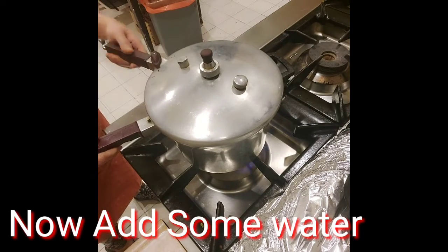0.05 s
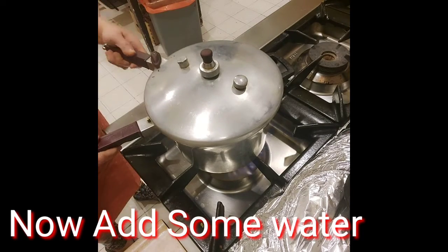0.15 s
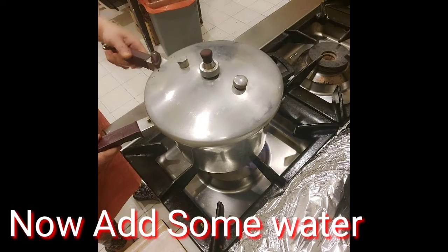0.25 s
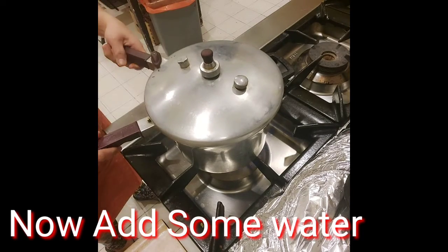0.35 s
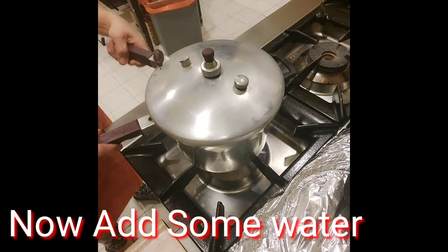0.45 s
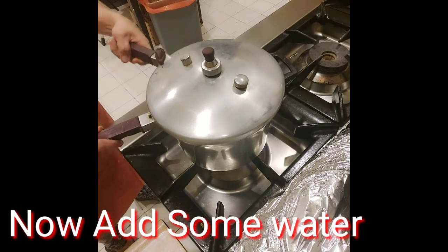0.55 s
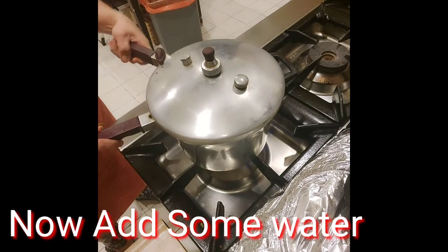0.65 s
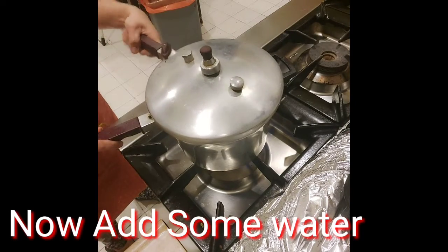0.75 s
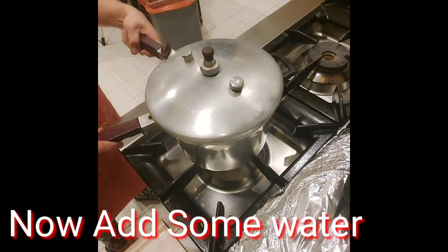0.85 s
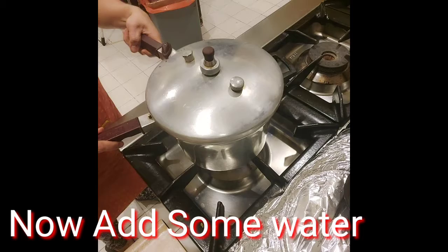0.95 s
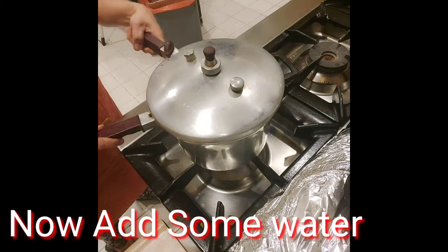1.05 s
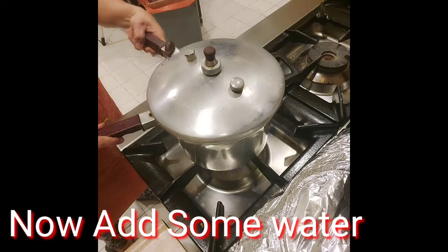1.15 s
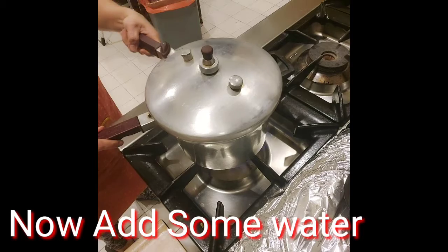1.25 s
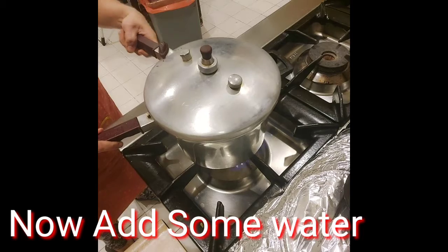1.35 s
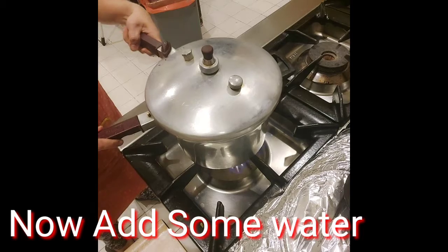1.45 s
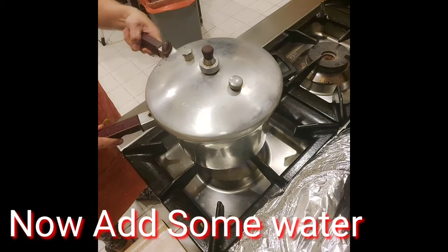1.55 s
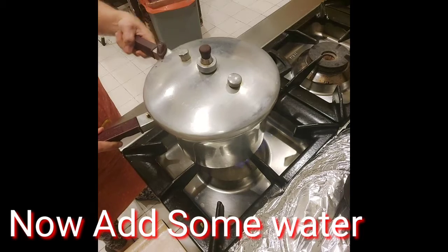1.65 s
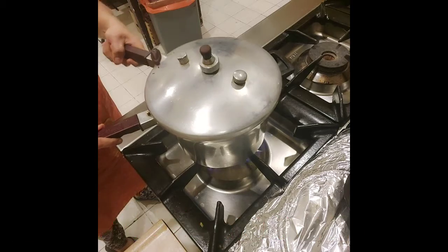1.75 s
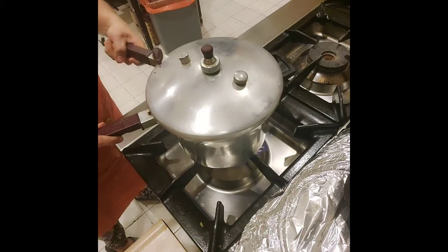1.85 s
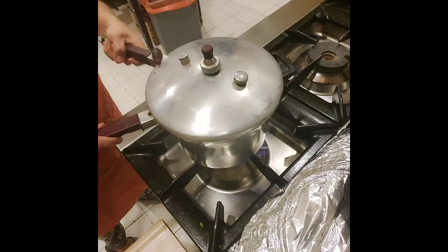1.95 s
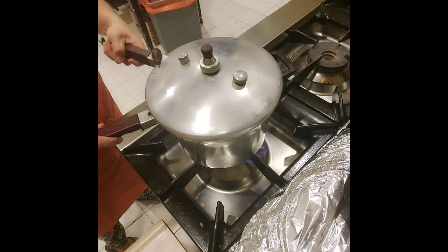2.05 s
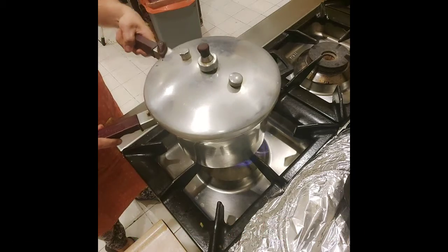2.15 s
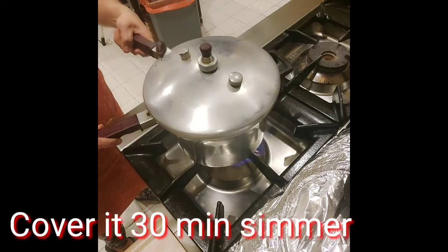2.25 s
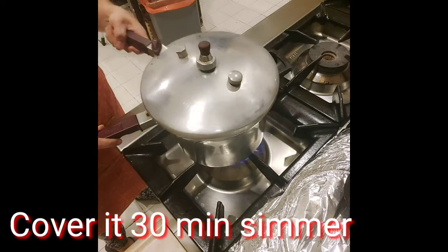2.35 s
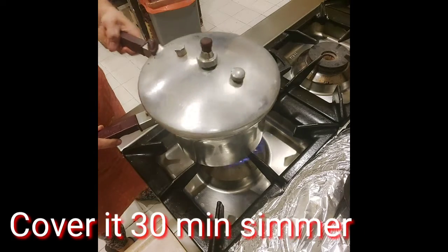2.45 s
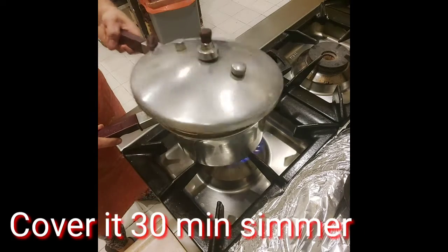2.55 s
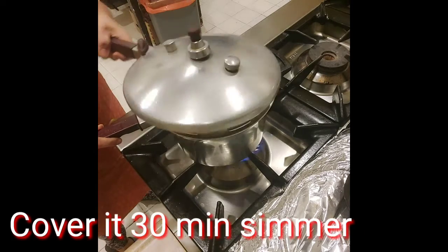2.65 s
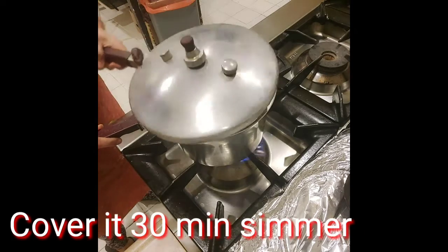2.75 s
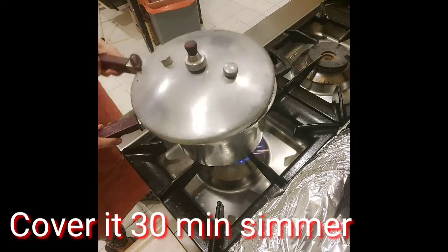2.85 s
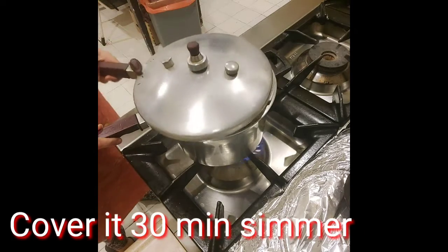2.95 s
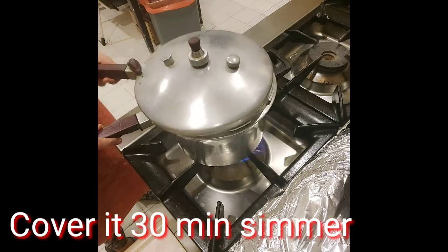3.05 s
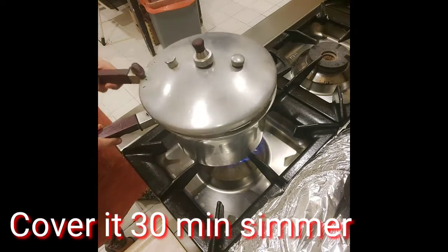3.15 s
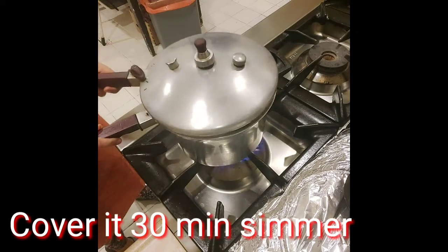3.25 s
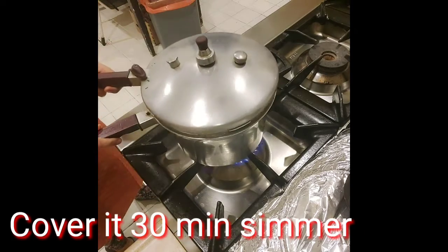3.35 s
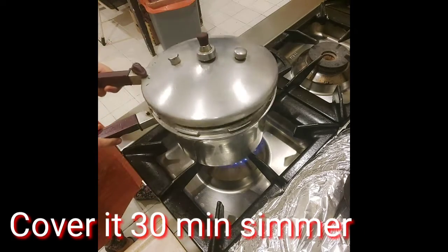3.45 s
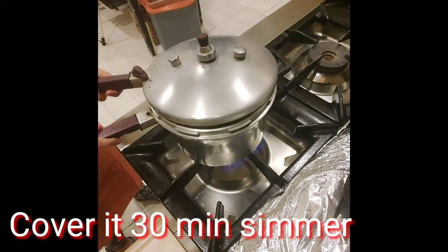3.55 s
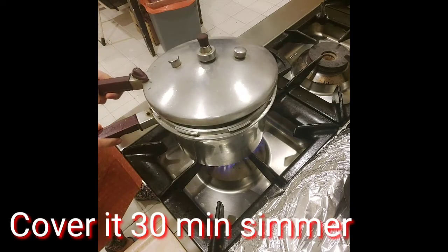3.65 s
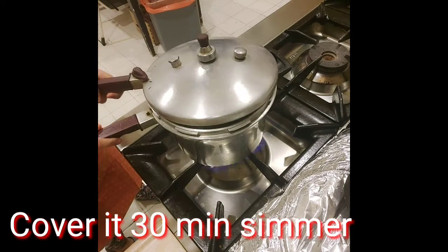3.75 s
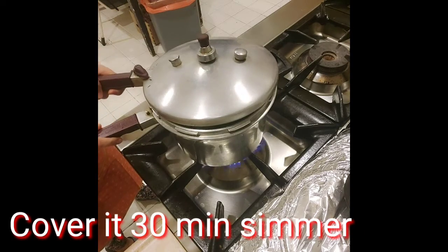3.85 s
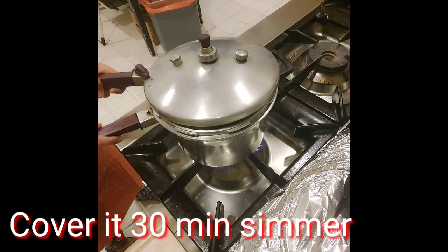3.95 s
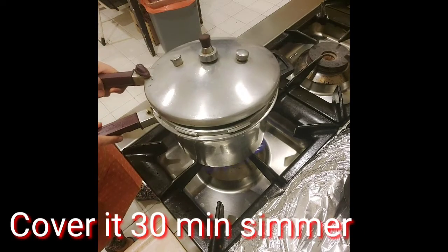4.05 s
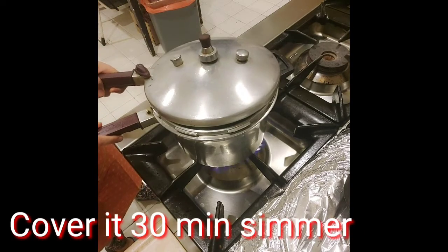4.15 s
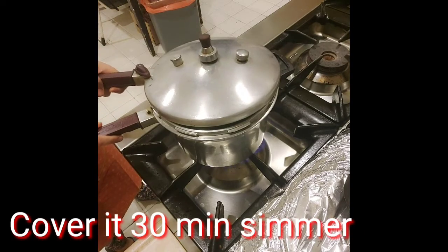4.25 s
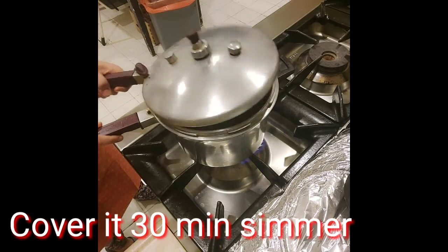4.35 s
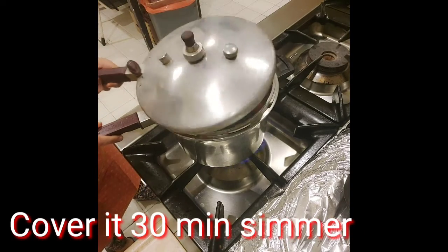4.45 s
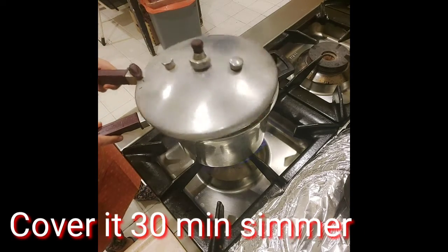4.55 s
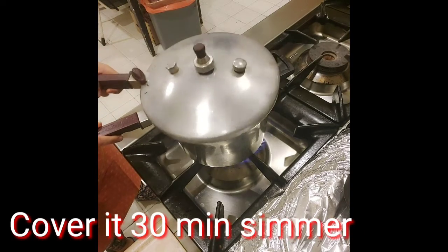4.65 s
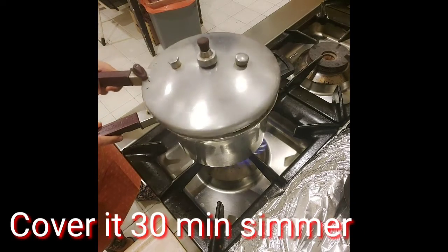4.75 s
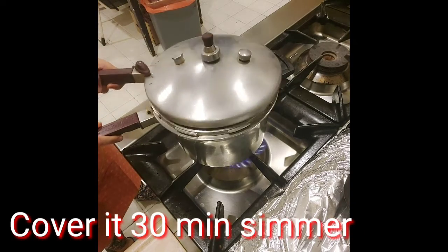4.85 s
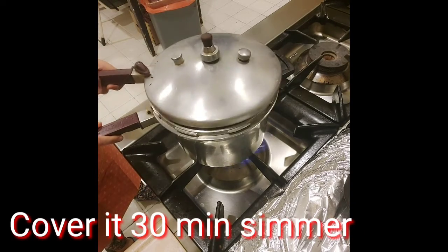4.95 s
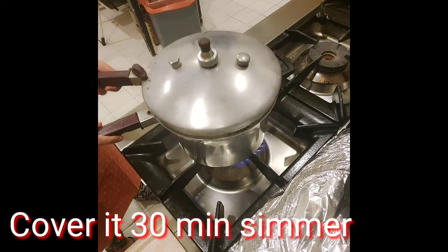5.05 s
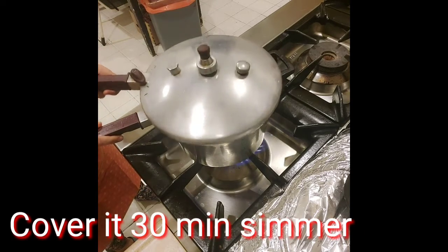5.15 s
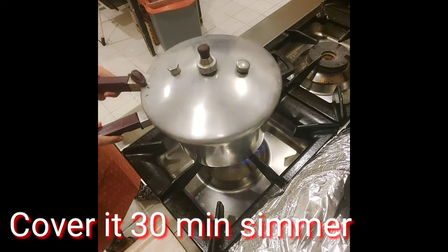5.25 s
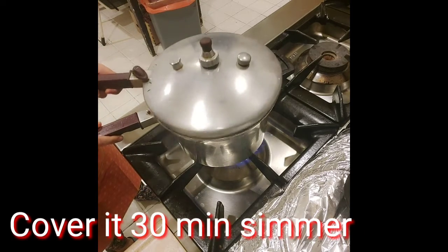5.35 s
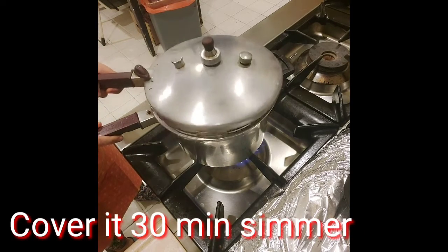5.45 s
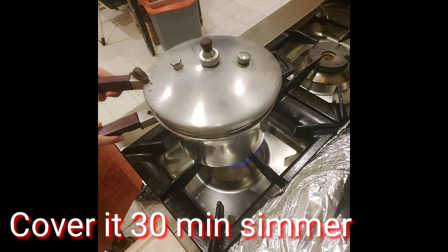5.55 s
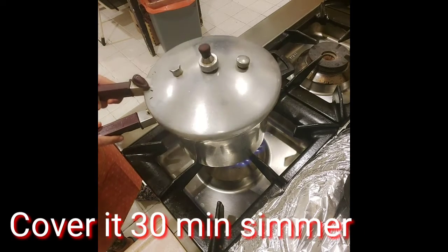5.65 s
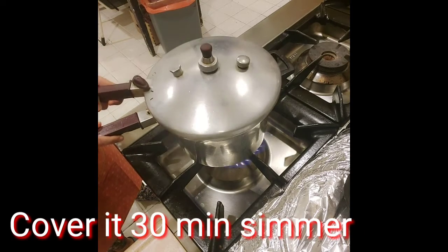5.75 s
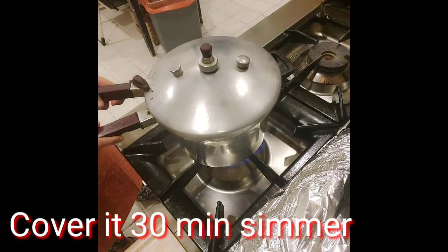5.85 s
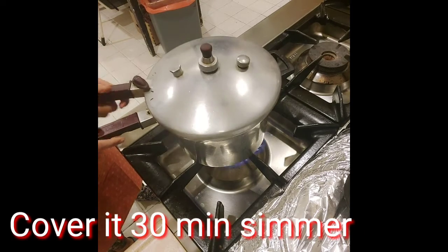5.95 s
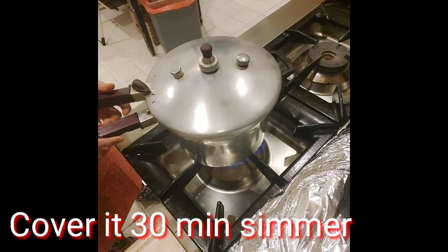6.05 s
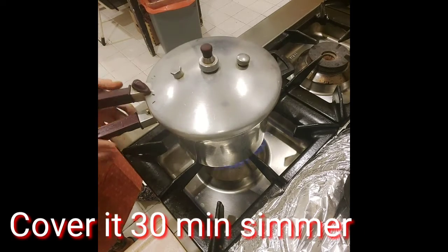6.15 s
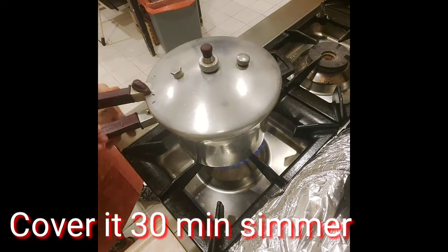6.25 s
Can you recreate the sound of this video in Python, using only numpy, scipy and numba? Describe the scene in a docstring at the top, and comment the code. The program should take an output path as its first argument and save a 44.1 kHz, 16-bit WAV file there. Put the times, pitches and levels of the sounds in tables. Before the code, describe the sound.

A heavy aluminium pot lid is twisted, lifted and rattled back onto its rim, clanking and scraping over a low kitchen burner rumble.

```python
"""A heavy aluminium lid is turned, lifted, rocked and set down on its pot over a gas burner in a kitchen. Each
knock is a noisy crack that rings the lid's modes, the air in the pot, the stove top and a low room boom; the
air note falls as the gap closes. Stick-slip grit scrapes the rim between knocks, narrow noise bands squeak as
the rubber seal drags, and flickering noise bands hum, rumble and hiss behind."""
import sys
import numpy as np
from scipy import signal
from scipy.fft import rfft, irfft
from scipy.io import wavfile
from scipy.ndimage import uniform_filter1d
from numba import njit

SR = 44100
rng = np.random.default_rng(int(sys.argv[2]) if len(sys.argv) > 2 else 0)


def boost_factor(decibels):
    """Convert a level in decibels to a linear amplitude factor."""
    exponent = np.asarray(decibels, float) / 20
    return 10 ** exponent


def output_pcm(signal):
    """Save a mono or channel-first signal as 16-bit PCM at the path in sys.argv[1].

    Samples are clipped to [-1, 1] before scaling.
    """
    pcm = np.clip(np.atleast_2d(signal).T, -1, 1) * 32767
    wavfile.write(sys.argv[1], SR, np.round(pcm).astype(np.int16))


N = 277830


def curve(rows):
    """Rows (time [s], value) joined by straight lines, one value a sample."""
    return np.interp(np.arange(N) / SR, *np.transpose(rows))


def band(x, lo_hz, hi_hz):
    """Band-pass, scaled so that white noise keeps its level."""
    sos = signal.butter(2, [lo_hz, hi_hz], "band", fs=SR, output="sos")
    return signal.sosfilt(sos, x) * np.sqrt(SR / 2 / (hi_hz - lo_hz))


def colour(x, points):
    """Shape a spectrum by (frequency [Hz], gain [dB]) points on a log frequency axis."""
    hz, db = np.transpose(points)
    f = np.maximum(np.fft.rfftfreq(N, 1 / SR), 1)
    return irfft(rfft(x) * boost_factor(np.interp(np.log(f), np.log(hz), db)), N)


def walk(rate_hz):
    """Slow random drift with spread 1."""
    k = int(SR / rate_hz)
    steps = np.repeat(rng.standard_normal(N // k + 1), k)
    w = uniform_filter1d(uniform_filter1d(steps, k), k)[:N]
    return w / w.std()


WIDE_HZ = 1170  # left and right are unrelated from here up


def pair(hz):
    """Left and right noise, alike in the bass and unrelated above."""
    mid, side = rng.standard_normal((2, N))
    wide = min(hz / WIDE_HZ, 1)
    return np.array([mid + wide * side, mid - wide * side]) / np.sqrt(1 + wide ** 2)


@njit
def resonate(drive, hz, t60_s):
    """One decaying mode, a complex resonator whose pitch may move."""
    out, z, loss = np.empty(len(drive), np.complex128), 0j, np.exp(-np.log(1000.) / (t60_s * SR))
    for i in range(len(drive)):
        z = z * loss * np.exp(2j * np.pi * hz[i] / SR) + drive[i] + 1e-18
        out[i] = z
    return out


def mode(drive, hz, t60_s):
    """A mode reaches the two microphones with a phase gap that grows with pitch up to WIDE_HZ."""
    z = resonate(drive, hz * np.ones(N), 1. * t60_s)
    gap_rad = .75 * min(np.mean(hz) / WIDE_HZ, 1) * rng.choice([-1, 1])
    return np.array([(z * np.exp(1j * gap_rad)).imag, (z * np.exp(-1j * gap_rad)).imag])


# hum spectrum: (frequency [Hz], relative density [dB per Hz])
HUM_SPECTRUM = [(15, -58.5), (25, -23), (53, -1), (161, -7.5), (217, -17.5), (405, -14), (607, -20.5),
                (796, -21.5), (887, -27.5), (988, -25), (13200, -40.5), (16000, -38)]
# boomy notes: (frequency [Hz], width [Hz], boost [dB])
HUM_BOOMS = [(64, 5.9, 6.5), (163.5, 8.3, 10.5), (380, 18, 5)]
# kitchen background ahead of the microphone colour: (time [s], level [dB])
KITCHEN_LEVEL = [(0, -40), (.4, -40.5), (1.3, -35), (2.9, -37.5), (4.2, -37.5), (5.1, -36.5), (6.3, -36.5)]


def kitchen():
    """Burner and fan rumble in half-octave bands that flicker alone, with a few boomy notes."""
    out = 0
    for hz in 30 * 2 ** np.arange(0, 9.1, .5):
        flicker = boost_factor(2.7 * walk(13))
        # sqrt(hz) evens the density of bands that widen with pitch
        out = out + flicker * band(pair(hz), hz / 1.212, hz * 1.317) * np.sqrt(hz)
    f = np.fft.rfftfreq(N, 1 / SR)
    boom = boost_factor(sum(db / (1 + (2 * (f - hz) / w) ** 2) for hz, w, db in HUM_BOOMS))
    out = irfft(rfft(colour(out, HUM_SPECTRUM)) * boom, N)
    return out / out.std() * boost_factor(curve(KITCHEN_LEVEL))


# mean hiss ahead of the microphone colour: (time [s], level [dB])
HISS_LEVEL = [(0, -70), (.9, -53), (1.5, -55.5), (2.2, -45), (2.7, -65), (6.3, -58)]


def hiss():
    """Faint airy band noise at the very top, probably the gas jet."""
    level_db = curve(HISS_LEVEL) + 1.7 * walk(5.9)
    return boost_factor(level_db) * band(pair(BAND_HZ[4]), 8700, 14500)


# rim on rim: (start [s], hold [s], grit drive [dB], t60 of the fade [s])
RIM_SLIDES = [(0.823, 0.051, -35, 0.96), (1.793, 0.038, -26.5, 0.55), (1.96, 0.12, -49, 1.1),
              (2.25, 0.031, -19.5, 0.63), (3.217, 0.26, -41.5, 0.5), (3.631, 0.0081, -35.5, 0.36),
              (4.424, 0.14, -46.5, 0.14), (4.678, 0.0088, -28.5, 0.2), (4.904, 0.27, -50, 0.33),
              (5.18, 0.039, -45.5, 0.74), (5.432, 0.15, -38.5, .3), (5.694, 0.049, -46, 1.05)]
SLIDE_ATTACK_S, HANDLING_DB = 0.031, -69.5


def sliding():
    """Strength of the rubbing: each slide swells, holds and fades over faint handling."""
    t, power = np.arange(N) / SR, boost_factor(HANDLING_DB) ** 2
    for s, hold_s, db, t60_s in RIM_SLIDES:
        swell = np.clip((t - s) / SLIDE_ATTACK_S, 0, 1) ** 2
        fade = 1000. ** (-np.maximum(t - s - SLIDE_ATTACK_S - hold_s, 0) / t60_s)
        power = power + (boost_factor(db) * swell * fade) ** 2
    return np.sqrt(power)


def scrape():
    """Stick-slip grit: dense clicks of uneven size, about 2500 a second."""
    size = boost_factor(2.4 * rng.exponential(size=N))
    slipping = rng.random(N) < 2500 / SR
    slips = slipping * np.clip(rng.standard_normal(N) * size, -2.5, 2.5)
    return slips / slips.std() * sliding() * boost_factor(4 * walk(60))


def rasp(grit):
    """Each slip of the grit lets out a grain of noise in the middle and upper bands."""
    middle = band(np.abs(grit) * pair(BAND_HZ[3]), 500, 5000)
    upper = band(np.abs(grit) * pair(BAND_HZ[4]), 3300, 12200)
    return middle + boost_factor(-8.5) * upper


# lid on rim: (time [s], drive at 2-4.5 kHz [dB],
#   then relative to it: pot air [dB], lower ring [dB], top edge [dB])
LID_KNOCKS = [(0.603, -33, -24, 10.5, -28), (0.803, -45.5, 5, 4, -8), (0.833, -5.5, -9.5, 4.5, -11.5),
              (0.9057, -19, -9, -3, -14.5), (1.1007, -42.5, -18, 10, 5), (1.805, -18.5, -19, -3, -14),
              (1.822, -20, -6, 6.5, -25), (1.8291, -16.5, 1.5, 6.5, -22), (1.837, -10, -8.5, 2, -10),
              (1.8442, -8, -39, -1.5, -13), (1.8668, -7.5, -44, -40, -21), (1.894, -11, -19, -20, -16.5),
              (2.0975, -34.5, -23, 17, -30), (2.2455, -44.5, -8, 17.5, 4), (2.267, -8, -43, 1, -3),
              (2.305, -16, -33, 0, -20), (2.3468, -10, -49, -11, -18), (2.4002, -24.5, -39, 3.5, -38),
              (2.411, -9, -23, -7, -24), (2.543, -31.5, 10.5, 1, -18.5), (2.5752, -25, -13, 7.5, -16),
              (2.6528, -15, -30, -36, -18.5), (3.0551, -4, -16, -4.5, -19), (3.0952, -15, -36, -13, -40),
              (3.214, -8.5, -15.5, -3.5, -22), (3.24, -6.5, -14.5, -4.5, -15.5),
              (3.249, -7, -13.5, -3, -18), (3.2782, -4.5, -19, -11.5, -17.5), (3.3587, -12.5, -7, -6, -41),
              (3.3944, -16, -7.5, -0.5, -21), (3.449, -20.5, -6, -5, -38), (3.465, -17, -8, -1, -25),
              (3.488, -34, -2, -10.5, -22), (3.6299, -27.5, -0.5, 5.5, -18), (3.6467, -35.5, 13.5, 13, -21),
              (3.6676, -22.5, 1.5, 3, -10.5), (3.727, -34, -7, 4, -31), (3.9078, -43.5, 13, 4, -5),
              (3.932, -38, 6.5, -4, -14), (4.444, -33, -20, -1, -17), (4.4522, -18, -18, -1, -23),
              (4.4645, -35.5, 4.5, 14, -30), (4.497, -34.5, -3, 8.5, -32), (4.5468, -16.5, -23, -18, -27),
              (4.679, -3, -34, -9, -21), (4.7459, -13, -15, 2.5, -10), (4.7514, -3.5, -13.5, -13, -21),
              (4.7981, -25, -20, -17, -31), (4.821, -8.5, -16, -8, -22.5), (4.8852, -22.5, -8, -31, -20),
              (4.9121, -15, -11.5, -6.5, -40), (4.9684, -27, -12, 0, -15.5), (5.056, -27, -8, 2, -31),
              (5.1205, -37.5, 2, 5.5, -16), (5.196, -9.5, -18, -6, -17), (5.218, -9.5, -11.5, -2.5, -21),
              (5.2814, -31.5, 4.5, 8, -33), (5.3745, -41, 7.5, 8, -32), (5.442, -16.5, -8.5, -2, -6.5),
              (5.4506, -8.5, -15.5, -15, -31), (5.4745, -19, -11, 6, -9), (5.4941, -4.5, -18.5, -5, -17.5),
              (5.533, -30, -21, -9, -4), (5.559, -5, -11, -7, -18.5), (5.682, -8, -12.5, -7, -20),
              (5.702, -11, -9, -3, -15), (5.7607, -18.5, -11.5, -7, -10.5), (5.8019, -32.5, 1, -31, -8),
              (5.8192, -25.5, -26, -23, -26), (6.1328, -35.5, -1, -0.5, -15)]
# the pot shifts on its stand, dull: (time [s], drive [dB])
POT_THUDS = [(0.805, -29.5), (1.806, -16.5), (1.829, -15), (2.0981, -29), (2.25, -22), (2.4011, -25.5),
             (3.3955, -31), (3.667, -29), (4.4544, -31.5), (5.8013, -19), (6.1327, -31)]


def blows(db, scatter_db=0.):
    """One impulse for each knock and thud; where it lands changes its sign and, with scatter, its size."""
    x, rows = np.zeros(N), LID_KNOCKS + POT_THUDS
    size, sign = rng.standard_normal((len(rows), 2)).T
    at = (np.array([row[0] for row in rows]) * SR).astype(int)
    np.add.at(x, at, boost_factor(db + scatter_db * size) * np.sign(sign))
    return x


LIFTED_S = 2.9  # the lid is loose on the rim from here
# share of a knock passed down to the stove and the room's low boom: more while the lid sits locked on the pot
THUMP_SEATED_DB, THUMP_LOOSE_DB = -15.5, -26


def knock_db():
    """Drive of every knock in the five bands, then of every thud, which has only the lowest."""
    s, peak, air, low, top = np.transpose(LID_KNOCKS)
    thump = np.where(s > LIFTED_S, THUMP_LOOSE_DB, THUMP_SEATED_DB)
    thuds = np.full((len(BAND_HZ), len(POT_THUDS)), -np.inf)
    thuds[0] = np.transpose(POT_THUDS)[1]
    return np.hstack([peak + np.array([thump, air, low, 0 * peak, top]), thuds])


# nominal band centres, setting stereo width: (frequency [Hz])
BAND_HZ = [130, 400, 1100, 3000, 9000]
# crack of contact in those bands: (low edge [Hz], high edge [Hz], t60 [s], burst gain [dB])
CRACK_BANDS = [(48.6, 185, 0.086, 2), (280.5, 455, 0.069, -1.5), (605, 1940, 0.026, -4),
               (2070, 3700, 0.031, -0.5), (4550, 11800, 0.07, 4)]


def cracks(level):
    """Contact throws off short noisy bursts, one decay a band."""
    out = 0
    for hz, db, (lo_hz, hi_hz, t60_s, crack_db) in zip(BAND_HZ, level, CRACK_BANDS):
        loss = np.exp(-2 * np.log(1000) / (t60_s * SR))
        power = signal.lfilter([1], [1, -loss], blows(db + crack_db) ** 2)
        # the first touch is one hard pulse, softer in gentle knocks
        touch = boost_factor(14) * blows(1.18 * db)
        out = out + band(pair(hz) * np.sqrt(power) + touch, lo_hz, hi_hz)
    return out


# lid and pot wall: (frequency [Hz], gain seated on the seal [dB], loose on the rim [dB],
#   hanging clear [dB], t60 [s])
LID_MODES = [(576.6, -10.5, -9.5, -5.5, 0.11), (824.3, -11, -13.5, -10.5, 0.16),
             (908.3, -9.5, -29, -15, 0.12), (957, -14, -4, -8.5, 0.056), (1089, -23, 3, -23, 0.081),
             (1147, -35, 0, -5, 0.062), (1350, -4.5, -27, -6, 0.088), (1606, 2.5, -31, 2, 0.041),
             (1806, -31, 9, -18, 0.024), (2100, -20, -12, -10, 0.12), (2283, -21, -5, 8, 0.084),
             (2270, 5, -16, -8, 0.028), (2418, 8, -9, -7.5, 0.062), (2355, -2, -18, -10.5, 0.27),
             (2590, -3, -7, -6, 0.11), (2720, -14, 0.5, -13.5, 0.032), (2870, -8, -2, 2.5, 0.1),
             (2957, 3, -0.5, -9, 0.1), (2998, -13, -1, 0, 0.065), (3400, -13, 6, 7, 0.092),
             (3396, 2, -3, -3, 0.043), (3950, -5.5, -8, -1, 0.076), (4050, -5, -29, -3, 0.095),
             (4725, -5, -23, -16, 0.065), (4945, -3.5, -36, -16, 0.058)]
# lid hangs clear of the rim: (from [s], to [s])
LID_CLEAR = [(2.25, 2.9), (4.53, 4.72)]
CLANG_DB, CLANG_T60_S = -16.5, 0.03


def lid(level, grit):
    """Knocks and grit ring the same modes, whose gains change as the lid is seated, loose or clear."""
    t = np.arange(N)
    out, loose = 0, t > LIFTED_S * SR
    clear = sum((t > a * SR) & (t < b * SR) for a, b in LID_CLEAR) > 0
    for hz, seated_db, loose_db, clear_db, t60_s in LID_MODES:
        # lower and upper ring follow their own knock columns
        own_db = level[2] if hz < 2000 else level[3]
        hits = blows(own_db, scatter_db=2)
        # shifting contact with the rim bends each mode a little
        waver = 1 + .003 * walk(25)
        reach = boost_factor(np.where(clear, clear_db, np.where(loose, loose_db, seated_db)))
        drive = reach * (boost_factor(-8.5) * hits + boost_factor(-33.0) * grit)
        out = out + mode(drive, hz * waver, t60_s)
        # a neighbour mode, damped by hand and seal, gives each knock its short clang
        clang = blows(own_db + CLANG_DB, scatter_db=4)
        out = out + mode(clang, hz * rng.uniform(.97, 1.03), CLANG_T60_S)
    return out


OPEN_HZ, WOBBLE = 408.6, 0.021  # wobble: rms share of the pitch
SETTLE_S, SETTLE_LENGTH_S, GAP_LEFT = 5.5, 0.345, 0.14


def air_hz():
    """Pitch of the pot air: goes with the root of the gap, which shrinks evenly as the lid settles."""
    shut = np.clip((np.arange(N) / SR - SETTLE_S) / SETTLE_LENGTH_S, 0, 1)
    gap = 1 - (1 - GAP_LEFT) * shut
    return OPEN_HZ * np.sqrt(gap) * (1 + WOBBLE * walk(8))


POT_T60_S, POT_DB = 0.12, 2.5


def pot_air(level, grit):
    """The air in the pot resonates to each knock and to the grit."""
    return mode(blows(level[1] + POT_DB) + boost_factor(-49) * grit, air_hz(), POT_T60_S)


# stove top under the pot, and the room's low boom at 65.8 Hz: (mean frequency [Hz], gain [dB], t60 [s])
STOVE_ROOM_MODES = [(65.8, -9, 1), (160, -3, 0.26), (272.5, -5.5, 0.2)]


def stove_and_room(level):
    """The stove top and the room answer knocks and thuds with low, wavering modes."""
    out = 0
    for hz, db, t60_s in STOVE_ROOM_MODES:
        thud = blows(level[0] + db, scatter_db=2)
        out = out + mode(thud, hz * (1 + 0.035 * walk(8)), t60_s)
    return out


ROOM_T60_S, ROOM_TOP_T60_S, ROOM_DB = 0.48, 0.4, -7.5


def room(x):
    """Tiled walls: decaying noise echo, shared in the bass, its own each side above, treble dying first."""
    t = np.arange(SR) / SR
    low, high = rng.standard_normal((2, 2, SR))
    own = signal.sosfilt(signal.butter(2, 450, "high", fs=SR, output="sos"), low[1])
    low = np.array([low[0] + own, low[0] - own])
    split = signal.butter(1, 4000, fs=SR)
    below = signal.lfilter(*split, low)
    above = high - signal.lfilter(*split, high)
    echo = below * boost_factor(-60 * t / ROOM_T60_S) + above * boost_factor(-60 * t / ROOM_TOP_T60_S)
    echo = echo * np.clip((t - .003) / 0.0032, 0, 1)
    echo = echo / np.sqrt((echo ** 2).sum(1, keepdims=True))
    return boost_factor(ROOM_DB) * signal.fftconvolve(x, echo, axes=1)[:, :N]


# seal drags: (start [s], length [s], drive [dB])
SEAL_SQUEAKS = [(1.288, 0.11, -43), (1.537, 0.095, -41.5), (1.71, 0.092, -38)]
# squeak bands: (frequency [Hz], width [Hz], mean gain [dB])
SEAL_BANDS = [(5240, 90, -10), (3600, 300, -14), (2130, 200, -15), (560, 80, -5)]


def seal():
    """Rubber drags on the rim and whistles roughly in a few narrow bands."""
    t, drag, whistle = np.arange(N) / SR, 0, 0
    for s, length_s, db in SEAL_SQUEAKS:
        drag = drag + boost_factor(db) * np.clip(np.minimum(t - s, s + length_s - t) / 0.022, 0, 1)
    for hz, width_hz, db in SEAL_BANDS:
        rough = boost_factor(db + 2.2 * walk(40))
        whistle = whistle + rough * band(pair(hz), hz - width_hz / 2, hz + width_hz / 2)
    return drag * whistle


# microphone colour: (frequency [Hz], gain [dB])
MIC_COLOUR = [(30, -18), (100, -4.5), (1000, -0.5), (3500, -8), (5000, -8.5), (7500, -17), (10000, -10.5),
              (13000, -15), (16000, -16)]
LEFT_DB = -1.5  # left against right


def scene():
    """Lid and pot near, their echo, and the kitchen behind."""
    level, grit = knock_db(), scrape()
    near = rasp(grit) + cracks(level) + lid(level, grit) + pot_air(level, grit) + stove_and_room(level)
    mix = near + room(near) + seal() + hiss() + kitchen()
    side = boost_factor(np.array([[LEFT_DB], [-LEFT_DB]]) / 2)
    return side * colour(mix, MIC_COLOUR)


def low_pass(x):
    """Removes everything above the highest recorded frequency."""
    return signal.sosfilt(signal.butter(12, 16480, fs=SR, output="sos"), x)


def record(dry):
    """Soft overload rounds the loudest peaks."""
    mix = np.tanh(1.059 * dry) / 1.047
    return low_pass(mix)


dry = scene()
out = record(dry)
output_pcm(out)
```